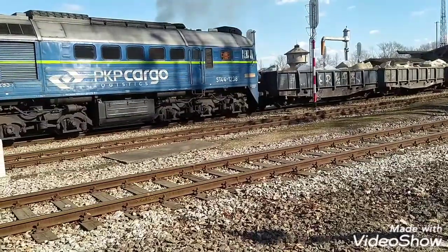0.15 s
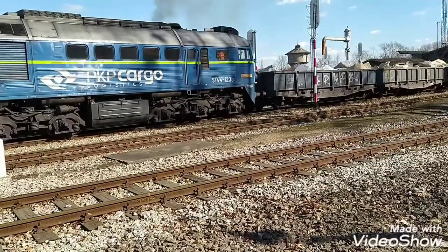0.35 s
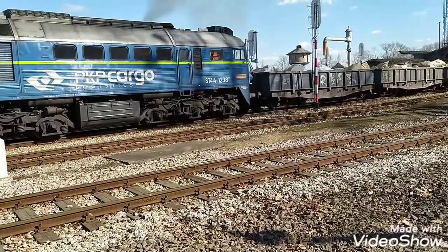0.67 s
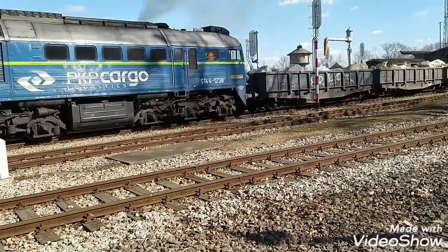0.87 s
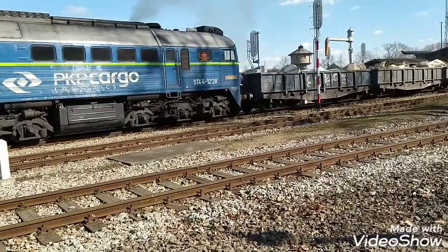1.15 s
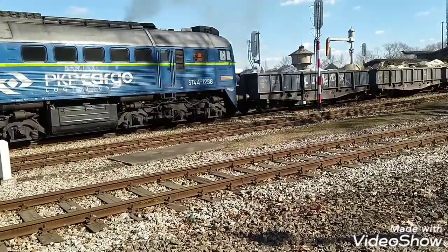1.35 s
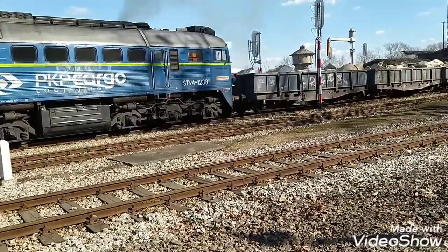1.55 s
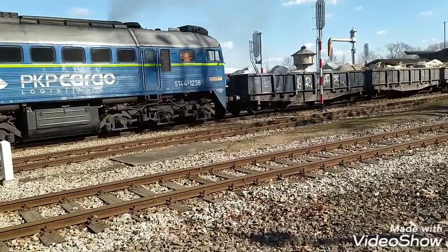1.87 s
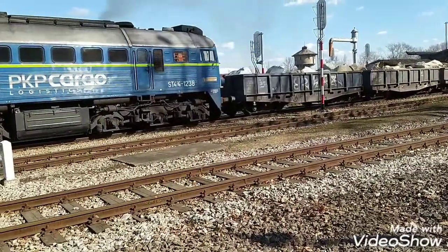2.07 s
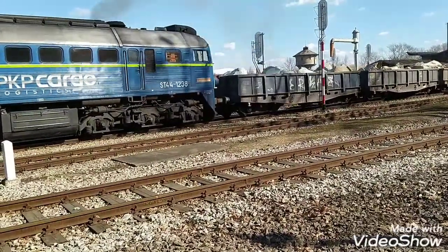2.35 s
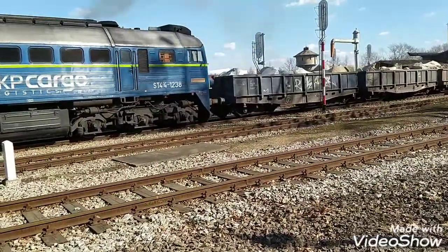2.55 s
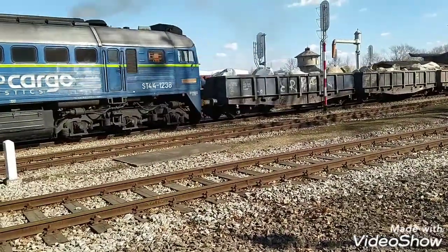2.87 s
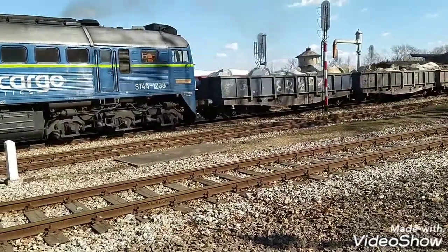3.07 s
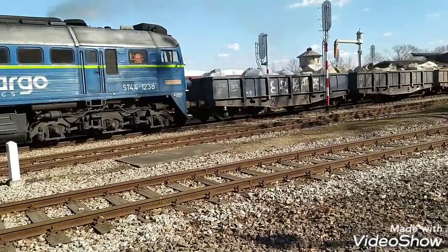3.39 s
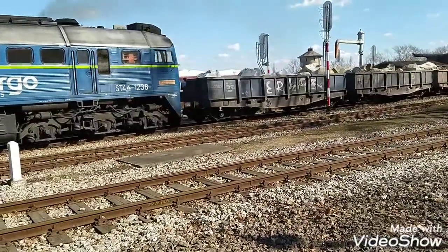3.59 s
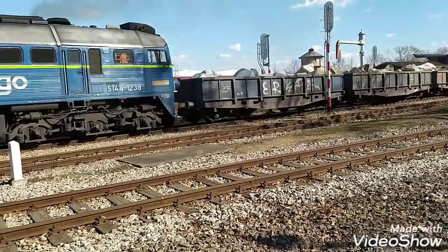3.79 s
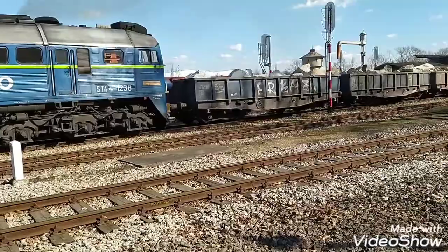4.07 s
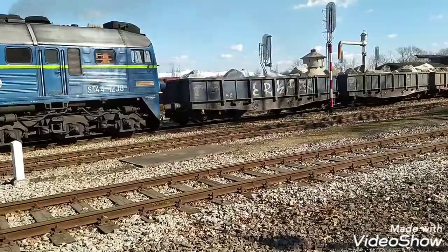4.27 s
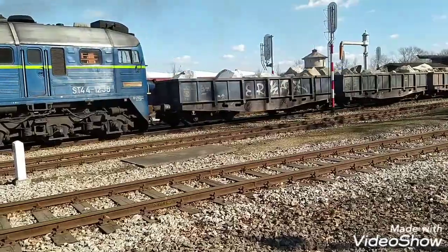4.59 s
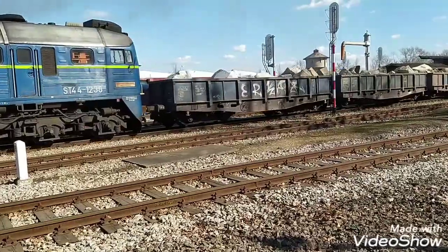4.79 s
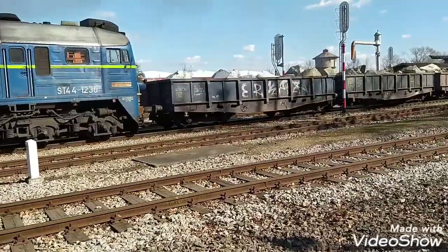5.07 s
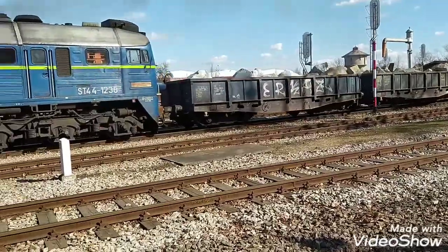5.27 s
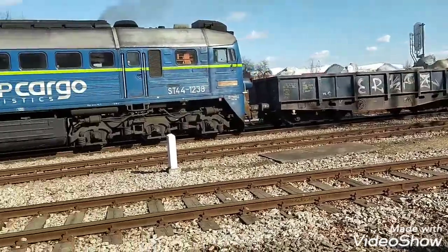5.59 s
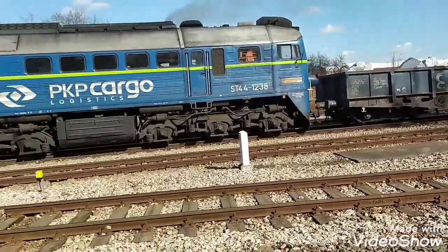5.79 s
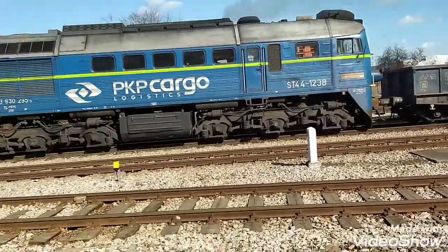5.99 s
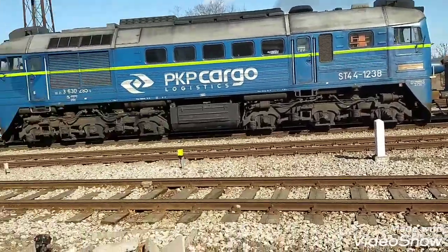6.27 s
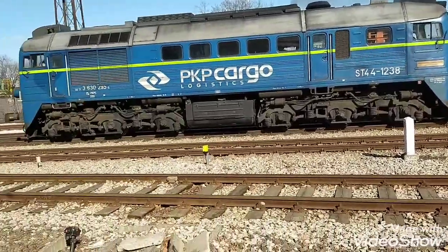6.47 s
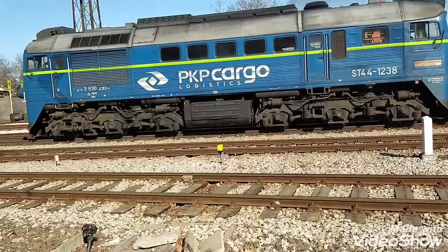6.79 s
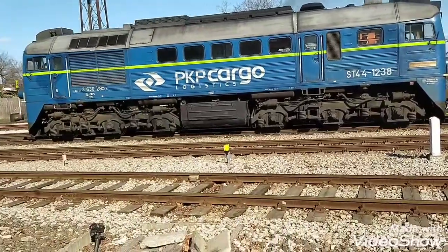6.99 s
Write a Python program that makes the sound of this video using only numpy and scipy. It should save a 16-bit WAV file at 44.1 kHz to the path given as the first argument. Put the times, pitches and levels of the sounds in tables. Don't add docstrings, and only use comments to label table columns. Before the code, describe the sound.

From the start, a heavy diesel locomotive works outdoors at slow speed, a deep note near 52 hertz throbbing a little over four times a second under a broad, rough exhaust roar. Faint traction hums glide upward and two breathy blower whistles sit above. Wind puffs touch the microphone around 0.3-0.6 seconds; a stronger gust arrives near 2, with hard low slaps on the right at 2.3-2.5. From about 2.5 a thin gear whine near 970 hertz emerges, strong around 3.4-3.8 and again at 5.4. The rasp opens up, fullest near 5 and at the end. Another double wind slap hits at 5. The handheld stereo microphone swings from 5.2 to 6, shifting the image; strap crackle builds, dry snaps cluster from 5.95 to 6.2, then a sharp rip quickly fades. The engine keeps throbbing until about 7.1, with no horn.

```python
import sys
import numpy as np
from scipy import signal
from scipy.io import wavfile
from scipy.ndimage import uniform_filter1d

SR = 44100
rng = np.random.default_rng(int(sys.argv[2]) if len(sys.argv) > 2 else 0)


def level_to_linear(level):
    exponent = np.asarray(level, float) / 20
    return 10 ** exponent


def wav_record(signal):
    frames = np.transpose(np.atleast_2d(signal))
    bounded = np.clip(frames, -1, 1)
    quanta = np.round(bounded * 32767).astype(np.int16)
    wavfile.write(sys.argv[1], SR, quanta)


N = 314874
SWING_START_S, SWING_END_S = 5.23, 6


def evened(x):
    return x / np.sqrt(np.mean(x ** 2) + 1e-20)


def read(points, hz, count=1):
    rows = np.transpose(points)
    return np.interp(np.log(hz + 1), np.log(rows[0] + 1), rows[count])


def curves(rows, t):
    s, *columns = np.transpose(rows)
    return [np.interp(t, s, c, left=c[0], right=c[-1]) for c in columns]


def wander(per_s):
    knots = rng.standard_normal(int(N / SR * 40) + 2)
    return evened(np.interp(np.arange(N) / SR * per_s, np.arange(len(knots)), knots))


def band(x, lo_hz, hi_hz):
    return signal.sosfilt(signal.butter(2, [lo_hz, hi_hz], "band", fs=SR, output="sos"), x)


# (order [twelfths of the firing rate], level [dB])
WEAK_ORDERS = [(17, -48.5), (18, -46), (20, -50.5), (35, -47), (52, -55.5)]


def exhaust():
    now = np.arange(N) / SR
    firing_hz = 52.265 + .2 * np.exp(-now / 2.2)
    cycle_hz = 4.3846 - .00748 * now
    start_turns = -.035
    firing = 2 * np.pi * np.cumsum(firing_hz) / SR
    cycle = 2 * np.pi * (np.cumsum(cycle_hz) / SR + start_turns)

    firing_db = -23.5 + 0.9 * np.cos(2 * np.pi * (now - 4.7) / 4.1)
    below_db = -27.9 - .17 * (now - 4.7) ** 2
    trade_db = 1.3 * now
    second_db, above_db = -47.5 + trade_db, -42.0 - trade_db

    beat = level_to_linear(firing_db) * np.cos(firing)
    beat += level_to_linear(below_db) * np.cos(firing - cycle)
    beat += level_to_linear(above_db) * np.cos(firing + cycle + 1.7)
    beat -= level_to_linear(second_db) * np.cos(firing - 2 * cycle)
    for order, db in WEAK_ORDERS:
        phase = order / 12 * firing + 2 * np.pi * rng.random()
        beat += level_to_linear(db + 4.6 * wander(1.214)) * np.cos(phase)
    return np.sqrt(2) * beat * level_to_linear([[1.9], [-2.6]])


# (start [s], end [s], starting pitch [Hz], level [dB])
TRACTION = [
    (-.3, 2.4, 70, -39),
    (-.2, 1.0, 249, -43),
    (1.1, 1.8, 260, -40),
    (1.1, 2.6, 224, -43),
    (4.4, 5.5, 249, -40),
    (5.5, 6.6, 256, -40),
    (.5, 1.8, 293, -44),
    (3.6, 4.7, 283, -43),
    (5.2, 6.2, 224, -43),
]
# (start [s], end [s], pitch [Hz], level [dB])
GEARS = [
    (2.4, 5.0, 86.5, -45),
    (5.2, 7.2, 86.5, -39),
    (2.0, 3.0, 154, -42),
    (5.8, 6.8, 149, -41),
    (0, 1.4, 844, -45),
    (2.7, 4.3, 845, -44),
    (6.5, 6.8, 845, -41),
    (.8, 2.4, 916, -46),
    (3.9, 5.1, 696, -45),
    (5.2, 7.2, 768, -44),
]


def motors():
    climb_hz_per_s = 4.1
    now, out = np.arange(N) / SR, np.zeros(N)
    waver = 1 + 0.00381 * wander(6.)
    tones = [(*row, climb_hz_per_s) for row in TRACTION] + [(*row, 0) for row in GEARS]
    for start, end, hz, db, climb in tones:
        share = np.clip((now - start) / (end - start), 0, 1)
        glide_hz = hz + climb * (end - start) * share
        phase = 2 * np.pi * np.cumsum(glide_hz * waver) / SR
        swell = np.sqrt(np.sin(np.pi * share) + 1e-12)
        out += level_to_linear(db) * swell * np.cos(phase)
    return np.sqrt(2) * out * level_to_linear([[1.5], [-3.]])


# (time [s], pitch [Hz], level [dB])
WHINE = [(0.0, 970.5, -46), (0.2, 969.6, -54), (2.5, 969.3, -39), (2.58, 968.7, -43.5),
         (3.36, 968.6, -32.5), (3.84, 968.8, -33), (4.36, 968.7, -37.5), (5.11, 968.6, -36.5),
         (5.43, 968.3, -31), (6.18, 968.0, -38.5), (6.22, 968.5, -50), (6.28, 966.1, -35),
         (6.44, 968.7, -41), (6.52, 965.5, -33.5), (6.72, 968.2, -38.5), (7.14, 964.1, -44)]


def whine():
    hz, db = curves(WHINE, np.arange(N) / SR)
    db = db + 1.5
    pan_db = 21 + 0.85 * (db - db.max())
    turn = np.exp(2j * np.pi * np.cumsum(hz) / SR)
    smooth = signal.butter(2, 14, fs=SR, output="sos")
    a, b = (evened(signal.sosfilt(smooth, v)) for v in rng.standard_normal((2, N)))
    flutter = 1 + .33 * (a + 1j * b)
    left = level_to_linear(db + 3.5) * turn * flutter
    right = level_to_linear(-pan_db) * left * np.exp(3.6j)
    return np.sqrt(2) * np.array([left.real, right.real])


# (frequency [Hz], density [dB per Hz])
ROAR = [(30, -59.5), (80, -53.5), (125, -66), (230, -50.5), (470, -69), (850, -58), (960, -61.5),
        (1070, -73.5), (1500, -67), (2000, -75.5), (2800, -76.5), (3400, -78.5), (4300, -86), (6500, -96)]
# (frequency [Hz], density [dB per Hz])
HISS = [(3000, -110), (6500, -95), (8000, -92.5), (9200, -89.5), (10000, -97), (11000, -104), (13000, -112),
        (16000, -125)]
# (centre [Hz], width [Hz], lift [dB])
CASING = [(152, 46, -4.5), (256, 44, -3.5), (675, 15, -6), (1192.5, 110, 9), (3780, 120, 2),
          (4890, 100, 4.5)]
# (time [s], rasp lift [dB])
FLANK = [
    (0.0, -6.5),
    (1.1, -2),
    (2.2, -2.5),
    (2.8, -2.5),
    (3.4, 1),
    (5.0, 3.5),
    (5.5, 2),
    (6.1, 1.5),
    (6.6, 1.5),
    (7.14, 4),
]


def engine_power(f, t):
    rasp_db, = curves(FLANK, t)
    upper_db = rasp_db * np.exp(-(f / 2000.0) ** 2)
    load_db = np.where(f < 500, 0.15 * rasp_db, np.where(f < 1020, 0.17 * rasp_db, upper_db))
    casing_db = sum(db / (1 + (2 * (f - at) / width) ** 2) for at, width, db in CASING)
    roar_db = read(ROAR, f) - 10.4 * np.maximum(f / 6500 - 1, 0)
    hiss_db = read(HISS, f) + 0.055 * rasp_db
    return level_to_linear(roar_db + casing_db + load_db) ** 2 + level_to_linear(hiss_db) ** 2


# (time [s], level [dB])
BLOWER = [(0, -45), (.7, -45), (1.0, -40), (1.5, -41.5), (2.4, -48), (3.2, -43.5), (3.9, -50), (4.9, -44.5),
          (5.4, -52), (5.8, -46), (6.3, -50.5), (7.14, -45.5)]


def blower_power(f, t):
    rise_hz = 12.3 * t
    low_db, = curves(BLOWER, t)
    flicker_db = 3.2 * np.resize(wander(2.85)[::256], t.shape)
    high_db = -49.5 + 0.72 * (low_db - low_db.mean()) + flicker_db
    low = level_to_linear(low_db - 22.0) ** 2 / (1 + (2 * (f - 2235. - rise_hz) / 97.0) ** 4)
    high = level_to_linear(high_db - 16.5) ** 2 / (1 + (2 * (f - 3005. + .5 * rise_hz) / 85.0) ** 4)
    return low + high


# (frequency [Hz], left over right aside [dB], left over right ahead [dB],
# likeness [0-1], right leads aside [rad], right leads ahead [rad])
PORTS = [(50, -2, 19, 1, 0.91, -2), (130, 4, -1.5, 0.74, 0.12, 0.9), (462, 6, 6, 0.83, 0.89, .5),
         (670, 1, 0, 0.88, 1.12, -0.3), (855, 13.5, 3.5, 1, 0.27, -1.8), (1100, 2, 1.5, 0, 4.2, 1.5),
         (1530, 7, 5.5, 0.98, 3.94, 3.5), (1885, -2.5, -3.5, 0.32, 8.06, 7), (2350, 1, 1, 0.99, 7.04, 7.5),
         (2697, -3.5, -4.5, 0.53, 8.74, 6.5), (3130, 2, 7.5, 0.72, 9.76, 11), (4200, -2, -2, 0.2, 10, 8),
         (5530, -5.5, -6.5, 0.44, 10.8, 11), (6160, -3, -3, 1, 4 * np.pi, 4 * np.pi),
         (9000, -3.5, -3.5, 0.65, 4 * np.pi, 4 * np.pi), (10430, -9, -9.5, 1, 4 * np.pi, 4 * np.pi)]


def roar():
    frames, hz = N // 256 + 5, np.fft.rfftfreq(1024, 1 / SR)
    t = (np.arange(frames) * 256 / SR)[None]
    f = hz[:, None]
    a, b, c, d, patches = rng.standard_normal((frames, 513, 5)).T
    patches = evened(uniform_filter1d(uniform_filter1d(patches, 8, 0), 12, 1))
    power = engine_power(f, t) + blower_power(f, t)
    flicker_db = 0.84 * np.resize(wander(18.)[::256], t.shape) / (1 + (3100 / (f + 1)) ** 4)

    ahead = np.clip((t - SWING_START_S) / (SWING_END_S - SWING_START_S), 0, 1)
    pan_db = (1 - ahead) * read(PORTS, f) + ahead * read(PORTS, f, count=2)
    lead = (1 - ahead) * read(PORTS, f, count=4) + ahead * read(PORTS, f, count=5)
    same = np.clip(read(PORTS, f, count=3), 0, 1)
    left = a + 1j * b
    right = same * left + np.sqrt(1 - same ** 2) * (c + 1j * d)
    right = right * np.exp(1j * lead) * level_to_linear(-pan_db)
    z = np.array([left, right]) * np.sqrt(power) * level_to_linear(1.06 * patches + 20.0 + flicker_db)
    return signal.istft(z, nperseg=1024, noverlap=768)[1][:, :N]


# (time [s], level [dB])
GUSTS = [
    (.34, -31),
    (1.07, -35),
    (1.54, -38),
    (1.98, -24),
    (2.27, -40),
    (4.2, -43),
    (5.13, -42),
    (5.85, -36),
    (6.48, -41),
    (6.98, -40),
]


def buffet():
    now = np.arange(N) / SR
    level = level_to_linear(-37 - 1.5 * now + 2.5 * wander(8.))
    level = level + sum(level_to_linear(db) * np.exp(-((now - s) / 0.11) ** 2) for s, db in GUSTS)
    air = evened(band(rng.standard_normal((2, N)), 26.3, 36.0))
    return air * level * level_to_linear([[1.], [-5.]])


# (time [s], length [s], port [0 left, 1 right], level [dB])
PUFFS = [(0.299, 0.077, 1, -34), (0.538, 0.11, 1, -27.5), (.58, 0.1, 0, -27), (1.93, .1, 0, -28),
         (2.03, 0.11, 0, -26), (2.2, 0.15, 0, -27), (2.27, 0.056, 1, -24), (2.318, 0.076, 1, -23),
         (2.47, 0.1, 1, -22.5), (3.03, .06, 1, -30), (4.99, 0.055, 1, -21), (5.032, .1, 1, -24.5),
         (5.71, .1, 1, -29), (5.799, 0.11, 1, -32.5), (5.83, 0.11, 0, -23.5), (6.171, .1, 1, -25.5),
         (6.398, 0.13, 1, -33)]


def puffs():
    top_hz = (197, 380)
    skew = .7
    out = np.zeros((2, N + SR))
    for s, length, port, db in PUFFS:
        side = int(port > .5)
        size = int(2 * length * SR)
        first = int((s - 2 * length * .5 ** (1 / skew)) * SR)
        air = band(rng.standard_normal(SR // 2), 125.0, top_hz[side])
        gust = evened(band(air, 60.0, 476.0)[-size:])
        swell = np.sin(np.pi * np.linspace(0, 1, size) ** skew).clip(0) ** 3.2
        out[side, first:first + size] += level_to_linear(db) * gust * swell
    return out[:, :N]


# (time [s], level [dB], pitch [Hz])
SLAPS = [
    (2.262, -15, 175),
    (2.305, -19, 260),
    (2.347, -20, 230),
    (2.468, -21, 400),
    (4.962, -16.5, 220),
    (4.977, -16.5, 380),
]


def slaps():
    now, out = np.arange(N) / SR, np.zeros((2, N))
    for s, db, hz in SLAPS:
        swell = np.exp(-((now - s) / .008) ** 2)
        out[1] += level_to_linear(db) * swell * np.sin(2 * np.pi * hz * (now - s))
    return out


def crackle():
    now = np.arange(N) / SR
    rip_s, rip_length_s = 6.201, .05
    grains = (rng.random(N) < 3000. / SR) * rng.standard_normal(N)
    grains = grains * level_to_linear(1.5 * np.minimum(rng.exponential(1, N), 4))
    ring = evened(band(band(grains, 8160.0, 10300.0), 7950.0, 10300.0))
    ring = ring + 0.44 * evened(band(grains, 10700.0, 15300.0))

    drag = level_to_linear(-46.0 + 12.0 * np.minimum(now - rip_s, 0) + 2.0 * wander(14.))
    drag = drag * level_to_linear((8.0 - 150.0 * (now - rip_s)) * (now > rip_s))
    drag = drag * np.clip((now - SWING_START_S) / .3, 0, 1)
    late = now - rip_s - rip_length_s
    after = level_to_linear(-52.5) * np.exp(-(late / .13) ** 4)
    return ring * np.where(late < 0, drag, after)


# (time [s], peak level [dB])
SNAPS = [(5.948, -30), (5.9995, -32), (6.045, -31), (6.060, -21), (6.0857, -32), (6.0973, -20),
         (6.111, -33), (6.1505, -31), (6.1697, -27), (6.1815, -28), (6.1918, -27), (6.2025, -17)]


def snaps():
    t = np.arange(-60, 140) / SR
    out = np.zeros(N)
    shape = np.exp(-(t / 0.00029) ** 2) + 0.36 * (t > 0) * np.exp(-t / 0.0012)
    rip = [(SNAPS[-1][0] + .0045 * (k + rng.random()), -26 - .6 * k) for k in range(8)]
    for s, db in list(SNAPS) + rip:
        hz = rng.uniform(8700, 9600)
        ring = np.cos(2 * np.pi * hz * t) + 0.22 * np.cos(2 * np.pi * 0.91 * hz * t)
        out[int(s * SR) - 60:][:200] += level_to_linear(db - 3) * shape * ring
    return out


def strap():
    return (crackle() + snaps()) * level_to_linear([[-2.8], [2.2]])


def scene():
    engine = exhaust() + motors() + whine() + roar()
    wind = buffet() + puffs() + slaps()
    return engine + wind + strap()


# (frequency [Hz], threshold against the usual level [dB])
THINNED = [(3100, -30), (3300, -6), (3600, -6), (4500, -8), (4700, -30), (5600, -30), (5700, 1), (7300, -1),
           (8200, -10), (9650, -12), (9800, 2), (10900, 4), (11100, 8), (13300, 9), (13600, 16),
           (15800, 22)]


def thin(x):
    shift = 1024 - 254
    window = np.sqrt(signal.get_window("hann", 2048))
    padded = np.pad(x, ((0, 0), (shift, 0)))
    hz, t, z = signal.stft(padded, SR, window, nperseg=2048, noverlap=1024)
    power = (abs(z) ** 2).mean(0)
    usual = np.median(uniform_filter1d(power, size=41, axis=0), axis=1)[:, None]
    uneven_db = 3.5 * np.repeat(rng.standard_normal((len(t), 33)).T, 32, axis=0)[:len(hz)]
    keep = power > usual * level_to_linear(read(THINNED, hz)[:, None] + uneven_db) ** 2
    return signal.istft(z * keep, SR, window, nperseg=2048, noverlap=1024)[1][:, shift:shift + N]


def band_limit(x):
    return signal.sosfilt(signal.butter(12, 15800, fs=SR, output="sos"), x)


def record(dry):
    mix = thin(dry)
    return band_limit(mix)


dry = scene()
out = record(dry)
wav_record(out)
```